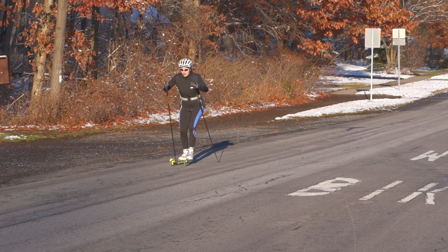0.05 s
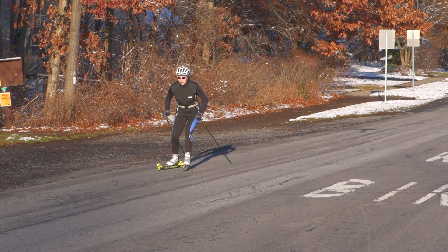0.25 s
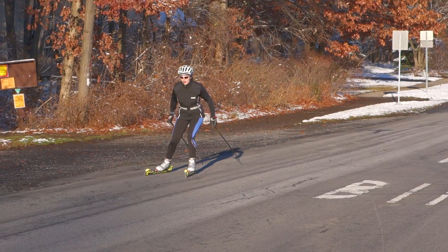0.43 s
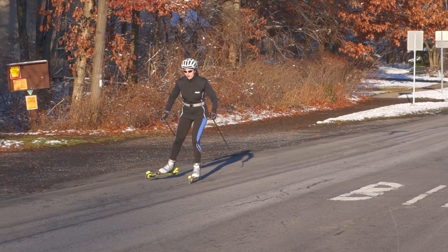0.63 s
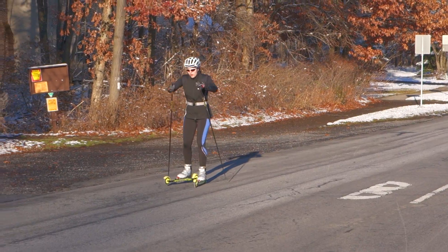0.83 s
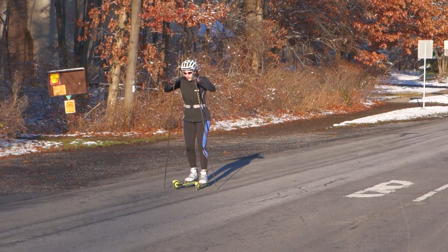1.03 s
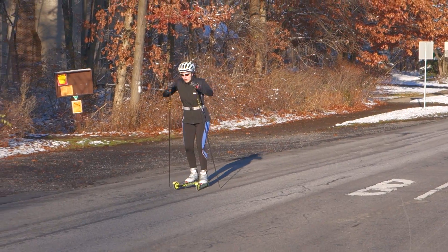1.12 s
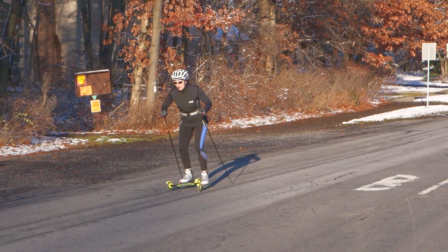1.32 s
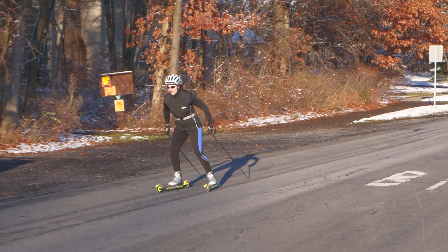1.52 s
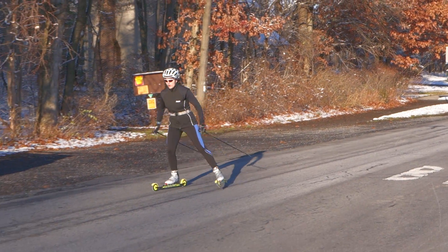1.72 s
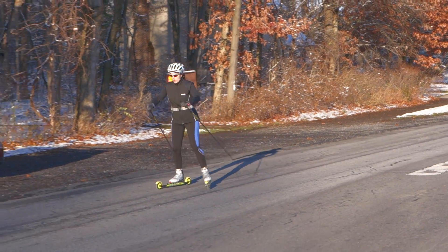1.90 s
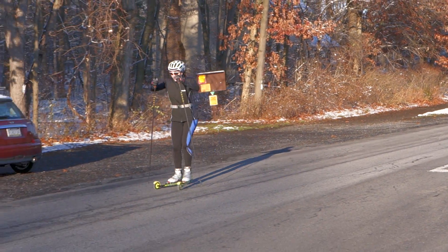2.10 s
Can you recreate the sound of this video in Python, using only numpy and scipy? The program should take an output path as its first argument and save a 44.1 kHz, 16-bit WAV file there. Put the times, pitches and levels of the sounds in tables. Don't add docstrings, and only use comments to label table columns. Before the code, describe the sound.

Roller skier's pole tips strike asphalt with a sharp ringing crack, then gritty scrapes and lighter ticks over low wheel rumble; outdoors by a wood, with a faint zoom motor buzzing close to the stereo microphones.

```python
import sys
import numpy as np
from scipy import signal
from scipy.io import wavfile

SR = 44100
rng = np.random.default_rng(int(sys.argv[2]) if len(sys.argv) > 2 else 0)


def amplitude_ratio(level_db):
    exponent = np.asarray(level_db, float) / 20
    return 10 ** exponent


def wrap_up_sound(samples):
    columns = np.atleast_2d(samples).T
    tamed = np.clip(columns, -1, 1)
    steps = np.round(tamed * 32767).astype(np.int16)
    wavfile.write(sys.argv[1], SR, steps)


N = 94815
BITE = 0.55
SKIER_SIDE_DB = 3
HISS_GAIN_HZ = 11750


def rms_one(x):
    return x / np.sqrt(np.mean(x ** 2) + 1e-20)


def at_hz(points, hz):
    curve_hz, values = np.transpose(points)
    return np.interp(np.log(hz), np.log(curve_hz), values)


def drift(rate_hz):
    r = np.exp(-2 * np.pi * rate_hz / (SR / 20))
    slow = signal.lfilter([1], [1, -2 * r, r * r], rng.standard_normal(N // 20 + 2002))
    slow = rms_one(slow[2000:])
    return np.interp(np.arange(N) / 20, np.arange(len(slow)), slow)


def bandpass(x, order, band_hz):
    return signal.sosfilt(signal.butter(order, band_hz, "band", fs=SR, output="sos"), x)


def resonate(x, hz, width_hz):
    r = np.exp(-np.pi * width_hz / SR)
    poles = [1, -2 * r * np.cos(2 * np.pi * hz / SR), r * r]
    return signal.lfilter([(1 - r * r) / 2, 0, (r * r - 1) / 2], poles, x + 1e-18)


def pan(x, db, lag_s=0.0):
    t = np.arange(x.shape[-1])
    late = np.interp(t - lag_s * SR, t, x)
    return np.array([x * amplitude_ratio(db / 2), late * amplitude_ratio(-db / 2)])


def place(track, start_s, sound):
    at = int(start_s * SR)
    track[at:at + len(sound)] += sound


def banded(white, spectrum, patchy_db, rate_hz):
    # frequency in Hz, shared part from 0 to 1.
    likeness = [(60, 1), (250, 0.99), (600, 0.79), (1400, 0.6), (3000, 0.86), (7000, 0), (15000, 0)]
    edges = spectrum[0][0] * 2 ** (np.arange(40) / 3)
    edges = edges[edges < 1.2 * spectrum[-1][0]]
    out, together = 0, drift(rate_hz)
    for k, (low, high) in enumerate(zip(edges, edges[1:])):
        mid, side = bandpass(white[k % 2], 2, [low, high])
        hz = np.sqrt(low * high)
        alike = np.clip(at_hz(likeness, hz), -1, 1)
        flicker = 0.64 * together + 0.88 * drift(rate_hz)
        gain = amplitude_ratio(at_hz(spectrum, hz) + patchy_db * flicker)
        stereo = np.sqrt(1 + alike) * mid + np.sqrt(1 - alike) * side * [[1], [-1]]
        out = out + gain * stereo
    return rms_one(out)


def outdoor_air():
    # frequency in Hz, density in dB per Hz.
    air_colour = [(240, -24), (400, -31), (708, 9), (893, 1), (1140, 1), (3070, 0.5), (5030, -11.5),
                  (9610, -0.5), (16000, -21)]
    white = rng.standard_normal((2, 2, N))
    return amplitude_ratio(-65) * banded(white, air_colour, patchy_db=5.0, rate_hz=18.0)


def wheels():
    # time in seconds, level in dB.
    roll_levels = [(0.0, -56), (0.3, -53), (0.32, -56.5), (0.4, -48.5), (0.419, -58.5), (0.459, -42),
                   (0.48, -54.5), (0.5, -46.5), (0.55, -49.5), (0.88, -56), (0.909, -52), (0.95, -58.5),
                   (1.339, -53.5), (1.38, -55), (1.57, -50.5), (1.6, -51.5), (1.62, -50), (2.15, -55.5)]
    # frequency in Hz, density in dB per Hz.
    roll_colour = [(15, -23), (25, -16.5), (124, -1), (204, 2.5), (315, -4), (465, -29), (667, -15.5),
                   (835, -17.5), (900, -39.5), (1170, -28), (1980, -120)]
    s, db = np.transpose(roll_levels)
    level = amplitude_ratio(np.interp(np.arange(N) / SR, s, db))
    white = rng.standard_normal((2, 2, N))
    return level * banded(white, roll_colour, patchy_db=-0.5, rate_hz=79.0)


def scrapes():
    # start in seconds, level in dB, rise in seconds, T60 in seconds.
    drags = [
        (0, -49, 0.0057, 1.13),
        (0.241, -42.5, 0.015, 0.77),
        (0.421, -51.5, 0.037, 1.76),
        (0.593, -50.5, 0.0018, 0.39),
        (1.158, -54.5, 0.011, 1.88),
        (1.5, -61.5, 0.065, 2.1),
        (1.95, -61, 0.1, 0.94),
    ]
    # frequency in Hz, density in dB per Hz.
    grit_colour = [(290, -55), (500, -12.5), (831, -13), (1000, -14), (1300, -10), (2260, -4), (3440, -5),
                   (7980, -15.5), (16000, -66)]
    # frequency in Hz, width in Hz, level in dB.
    shaft_tones = [(2120, 60, -8), (2620, 110, -6), (2920, 90, -9), (3450, 50, -8), (5420, 90, -7),
                   (7020, 80, -14), (7750, 70, -14)]
    grains_per_s, grain_spread_db, grain_share, ring_db = 3000, 3.0, 0.25, -3.5

    t, power = np.arange(N) / SR, 0
    for s, db, rise, t60 in drags:
        decay = amplitude_ratio(db - 60 * np.maximum(t - s - rise, 0) / t60)
        power = power + (decay * np.clip((t - s) / rise, 0, 1)) ** 2

    grain_size = amplitude_ratio(grain_spread_db * np.minimum(rng.exponential(1, N), 5))
    grit = grain_size * (rng.random(N) < grains_per_s / SR)
    grain_gate = rms_one(signal.lfilter([1], [1, -0.9], grit))
    white = rng.standard_normal((2, 2, N)) * (grain_share * grain_gate + 1 - grain_share)

    hiss = banded(white, grit_colour, patchy_db=1.5, rate_hz=40.0)
    rung = 0
    for hz, width_hz, db in shaft_tones:
        rung = rung + amplitude_ratio(db) * rms_one(resonate(white[1], hz, width_hz))
    mix = rms_one(hiss + amplitude_ratio(ring_db) * rung)
    return np.sqrt(power) * mix * amplitude_ratio([[SKIER_SIDE_DB / 2], [-SKIER_SIDE_DB / 2]])


def contact(length_s, low_hz, high_hz):
    t = np.arange(SR // 8) / SR / length_s
    hits = rng.standard_normal(len(t)) * np.sin(np.pi * np.clip(t, 0, 1) ** BITE)
    out = bandpass(hits + 1e-18, 3, [low_hz, high_hz])
    return out / np.abs(out).max()


def ticks():
    # start in seconds, peak in
    # dB, length in seconds, low edge in Hz, high edge in Hz.
    touches = [(0.2009, -34.5, 0.0026, 2110, 2800), (.2010, -44, 0.0033, 3750, 4170),
               (0.2, -44, 0.0061, 5000, 9400), (0.2254, -31, 0.014, 1500, 4600),
               (.2258, -33.5, 0.019, 4600, 10200), (.2290, -38, 0.014, 877, 1700),
               (0.234, -31.5, .013, 1520, 4000), (0.237, -37.5, 0.013, 4540, 7140),
               (0.26, -36.5, .016, 2040, 4260), (.2610, -45, .013, 5000, 9400),
               (0.442, -40, 0.0041, 2600, 4280), (0.451, -42, 0.006, 2400, 3100),
               (0.46, -41, 0.0044, 2800, 4260), (0.4603, -48, 0.0038, 5000, 11600),
               (.4980, -51, .004, 3500, 6460), (0.507, -43.5, 0.0034, 2000, 6000),
               (0.5947, -43.5, 0.0024, 6800, 13100), (.5990, -42, 0.0075, 2520, 8500),
               (0.613, -44, 0.0094, 1730, 2420), (.6520, -57, .003, 2500, 3620),
               (1.1437, -34.5, 0.0012, 9350, 13700), (1.1440, -41, 0.0039, 2800, 8500),
               (1.1455, -41, 0.0016, 7040, 14000), (1.151, -48, .010, 650, 1410),
               (1.1558, -39, 0.005, 4020, 8000), (1.1572, -38.5, 0.0036, 2200, 3620),
               (1.173, -52, 0.004, 2900, 4000), (1.62, -53, 0.02, 726, 900),
               (1.6420, -51, 0.0022, 4300, 6560), (1.909, -49, 0.0033, 690, 1720)]
    out = np.zeros(N + SR)
    for s, db, length_s, low_hz, high_hz in touches:
        place(out, s, amplitude_ratio(db) * contact(length_s, low_hz, high_hz))
    return pan(out[:N], SKIER_SIDE_DB)


def shaft(length_s):
    # frequency in Hz, level in dB.
    modes = [(620, -52.5), (764, -56), (1201, -47), (1337, -46), (1800, -38), (2115, -31.5), (2400, -40),
             (2565, -37), (2757, -39), (3418, -43), (4075, -44.5), (5540, -45), (5770, -45), (3025, -49)]
    t, out = np.arange(SR // 8) / SR, 0
    for hz, db in modes:
        phase_turns, late = rng.random(2)
        r = amplitude_ratio(-60 * hz / (12 * SR))
        delay_s = 0.002 * 1000 / hz
        bite = np.clip((t - delay_s) / length_s, 0, 1)
        swell = signal.lfilter([1], [1, -r], np.sin(np.pi * bite ** (BITE + 0.5 * late)))
        out = out + amplitude_ratio(db) * rms_one(swell) * np.sin(2 * np.pi * (hz * t + phase_turns))
    return out / np.abs(out).max()


def plants():
    # start in seconds, peak in dB, contact length in seconds.
    firm_plants = [
        (0.2247, -17.5, 0.011),
    ]
    out = np.zeros(N + SR)
    for s, db, length_s in firm_plants:
        crack = amplitude_ratio(-24) * contact(length_s, 920, 8000)
        place(out, s, amplitude_ratio(db) * (shaft(length_s) + crack))
    return pan(out[:N], SKIER_SIDE_DB)


def knocks():
    # start in seconds, peak in dB, length in seconds, first pitch in Hz, last in Hz.
    glides = [(.3880, -41, .010, 220, 130), (.5953, -35, .0013, 6500, 2800),
              (.5957, -36, .0022, 3400, 2800), (.5958, -43, .003, 1950, 1750),
              (.6992, -34, .0011, 4200, 1400), (.7000, -49, .003, 1500, 900), (.7015, -48, .004, 700, 500),
              (1.1440, -41, .0045, 2600, 650), (1.1546, -37, .0012, 4600, 2400),
              (1.1558, -39.5, .0042, 2650, 2550), (1.1558, -38.5, .0042, 3550, 3450),
              (1.1555, -44, .004, 4350, 4250), (1.5960, -38, .010, 260, 130),
              (1.9098, -49, .003, 2000, 1750), (1.9105, -47.5, .005, 480, 300)]
    out = np.zeros(N + SR)
    for s, db, length_s, first_hz, last_hz in glides:
        share = np.arange(int(length_s * SR)) / (length_s * SR)
        turns = np.cumsum(first_hz * (last_hz / first_hz) ** share) / SR
        swell = np.sin(np.pi * share ** BITE)
        place(out, s, amplitude_ratio(db) * swell * np.sin(2 * np.pi * turns))
    return pan(out[:N], SKIER_SIDE_DB / 2)


def motor_steps():
    step_hz, jitter_steps, weak_db, spread_db = 445.2, 0.05, -37, 2.5
    k = np.arange(int(N / SR * 420))
    luck = rng.standard_normal((len(k), 2))
    at = np.abs((k + jitter_steps * luck[:, 0]) / step_hz * SR).astype(int)
    steps = np.zeros(2 * N)
    steps[at] = amplitude_ratio(weak_db * (k % 2) + spread_db * luck[:, 1])
    return steps[:N] * rng.choice([-1, 1], N)


def zoom_motor():
    # frequency in Hz, width in Hz, buzz in dB, hiss in dB,
    # left over right in dB.
    housing = [(1833, 220, -90, -72, 20.5), (2272, 334, -62.5, -67, 14.5), (4830, 450, -105, -86, 35),
               (7280, 1400, -75, -73.5, 14.5), (9200, 2300, -72.5, -77.5, -4), (10850, 750, -74, -73.5, -8),
               (11450, 280, -84, -67.5, -9), (11930, 310, -71.5, -68, -6.5)]
    on_s, rise_s, far_side_lag_s = 0.663, 0.044, 0.0002227
    own_hiss_db = -7
    wash_db, wash_hz, wash_side_db = -74, (6000, 15200), 3

    steps = motor_steps()
    t, out = np.arange(N) / SR - on_s, 0
    throb_db = 3 * drift(61.0)
    for hz, width_hz, buzz_db, hiss_db, side_db in housing:
        grows = 4 * np.exp(-((hz - HISS_GAIN_HZ) / 750) ** 2) - 2 * (hz > wash_hz[0])
        throb_here = throb_db * min(hz / 8950, 1)
        hiss_level = amplitude_ratio(hiss_db + grows * t + throb_here + 1.6 * drift(60.0))
        buzz = resonate(resonate(steps, hz, width_hz), hz, 2 * width_hz)
        buzz = amplitude_ratio(buzz_db) * rms_one(buzz)
        white = rng.standard_normal((3, N))
        hiss = rms_one(resonate(resonate(white, hz, width_hz), hz, 0.78 * width_hz))
        out = out + pan(buzz + hiss_level * hiss[0], side_db, far_side_lag_s)
        out = out + hiss_level * amplitude_ratio(own_hiss_db) * hiss[1:]

    wash = rms_one(bandpass(rng.standard_normal((2, N)), 2, wash_hz))
    wash = wash * amplitude_ratio([[wash_side_db / 2], [-wash_side_db / 2]])
    out = out + amplitude_ratio(wash_db + throb_db) * wash
    return out * np.clip(t / rise_s, 0, 1)


def gear():
    # place as share of a turn, peak in dB, low edge in Hz, high edge in Hz.
    teeth = [
        (0., -53, 11000, 13000),
        (0., -55, 6800, 9600),
        (.125, -60, 11000, 12600),
        (.44, -56.5, 8600, 9600),
        (0.439, -55, 6700, 7700),
        (.64, -59, 6740, 9700),
    ]
    first_s, turn_s, tooth_s = 0.7805, 0.2134, 0.008
    fade_db_per_turn, spread_db = 0.6, 1.2
    out = np.zeros(N + SR)
    for turn in range(7):
        for share, db, low_hz, high_hz in teeth:
            fade_db = fade_db_per_turn * turn * (high_hz < HISS_GAIN_HZ)
            level = amplitude_ratio(db - fade_db + spread_db * rng.standard_normal())
            tick = level * contact(tooth_s, low_hz, high_hz)
            place(out, first_s + (turn + share) * turn_s, tick)
    return pan(out[:N], 4)


def scene():
    skier = wheels() + scrapes() + ticks() + plants() + knocks()
    return outdoor_air() + skier + zoom_motor() + gear()


def low_pass(x):
    return signal.sosfilt(signal.butter(12, 16310, fs=SR, output="sos"), x)


def record(dry):
    low_cut = signal.butter(2, 40, "high", fs=SR, output="sos")
    top_cut = signal.cheby2(8, 40, 16500, fs=SR, output="sos")
    mix = signal.sosfilt(top_cut, signal.sosfilt(low_cut, dry))
    return low_pass(mix)


dry = scene()
out = record(dry)
wrap_up_sound(out)
```